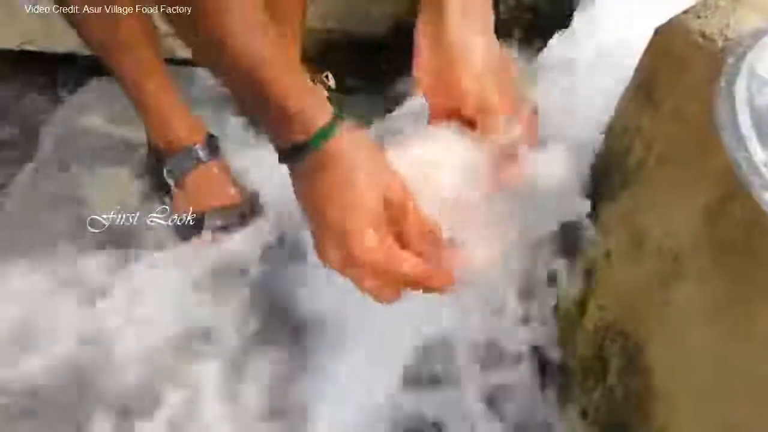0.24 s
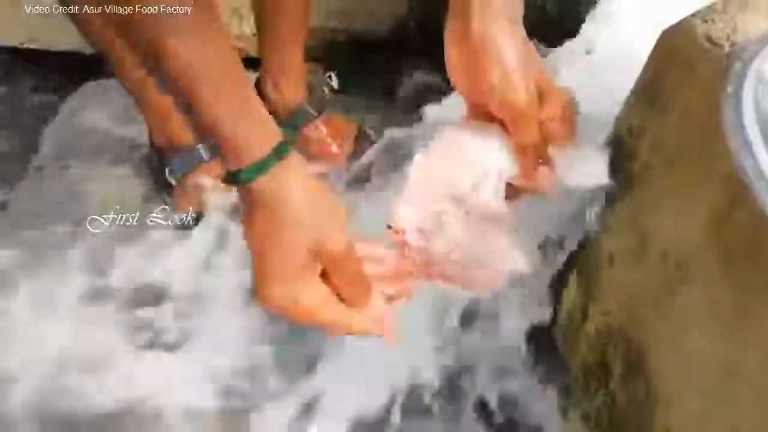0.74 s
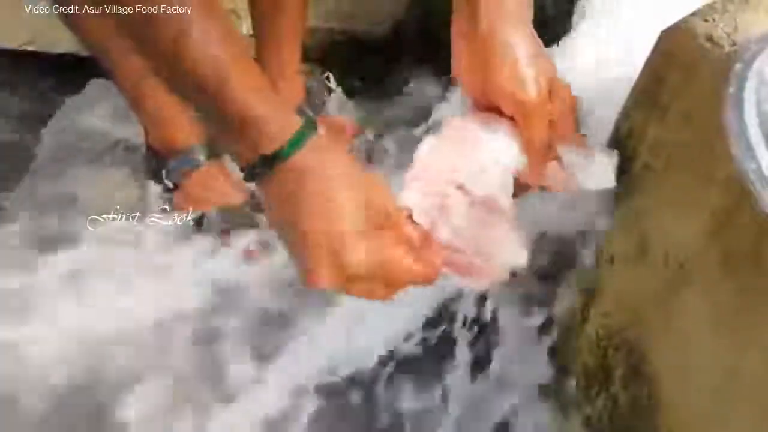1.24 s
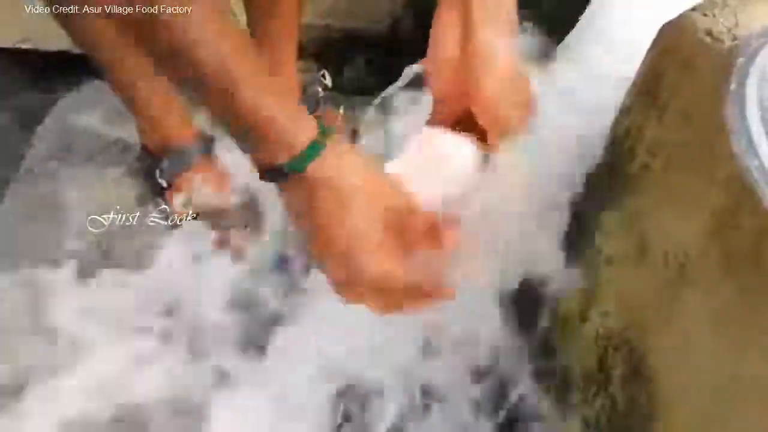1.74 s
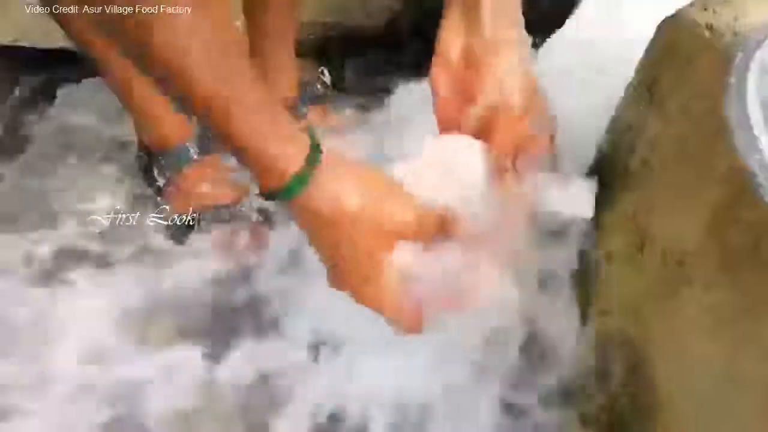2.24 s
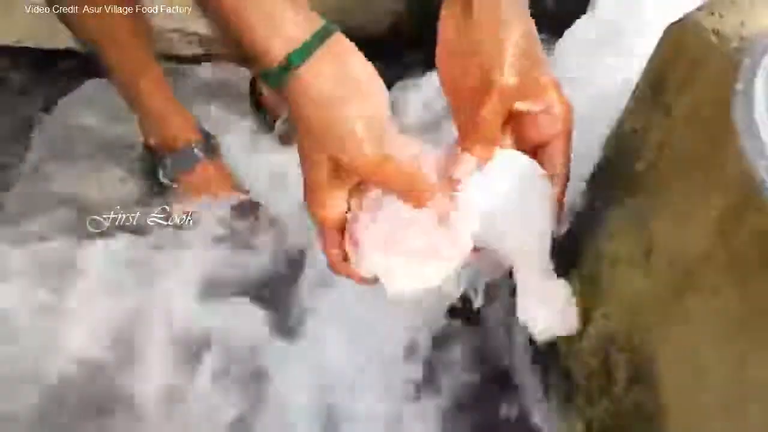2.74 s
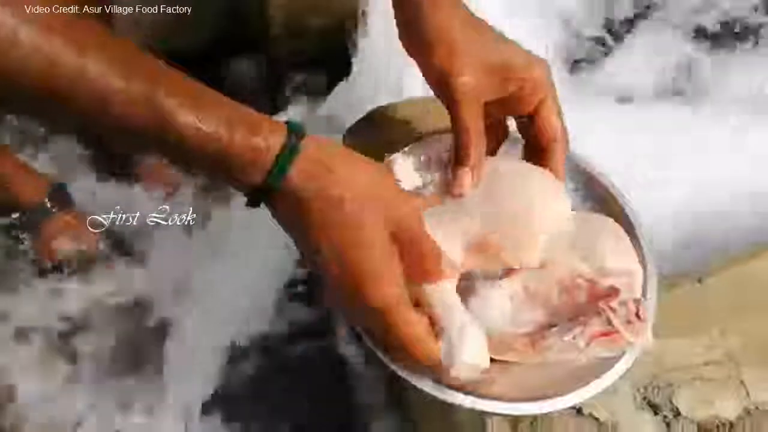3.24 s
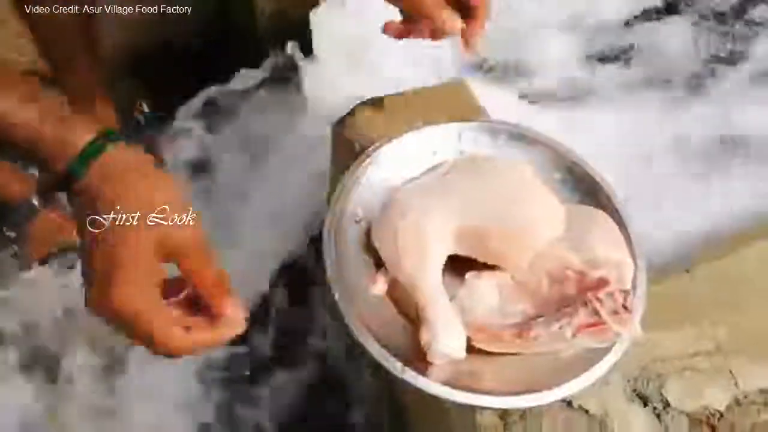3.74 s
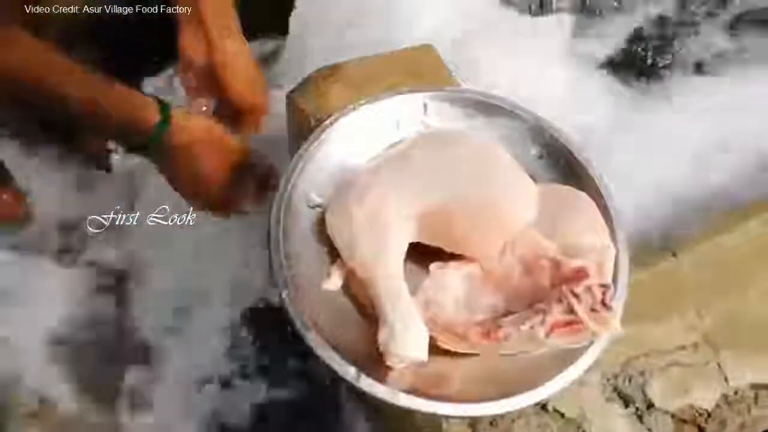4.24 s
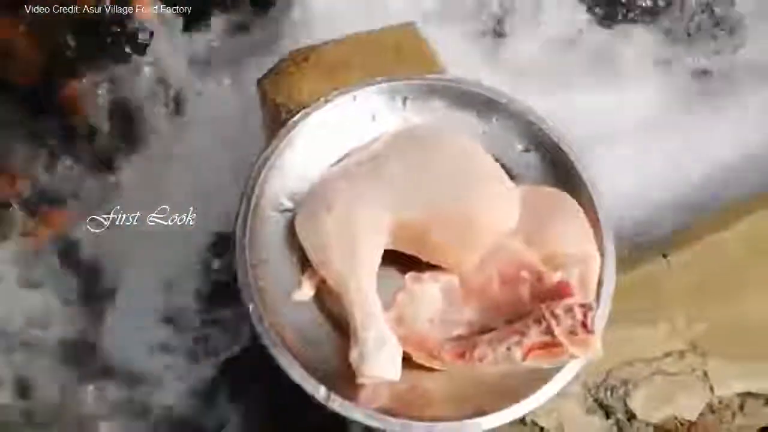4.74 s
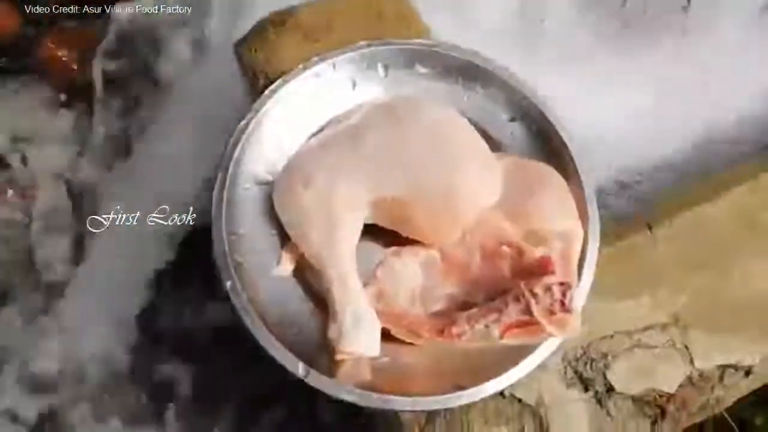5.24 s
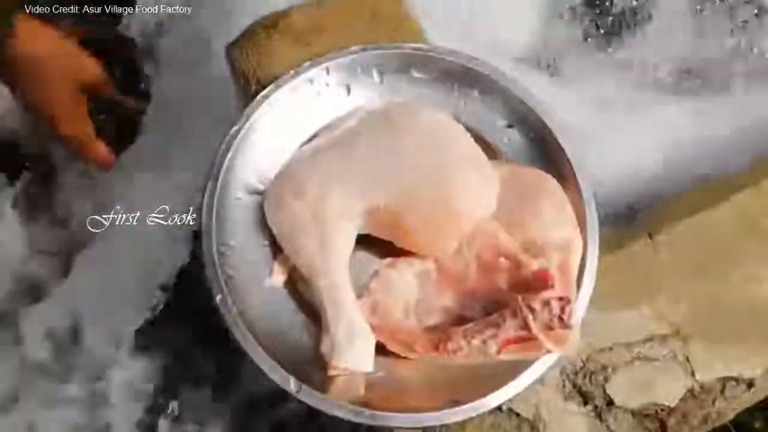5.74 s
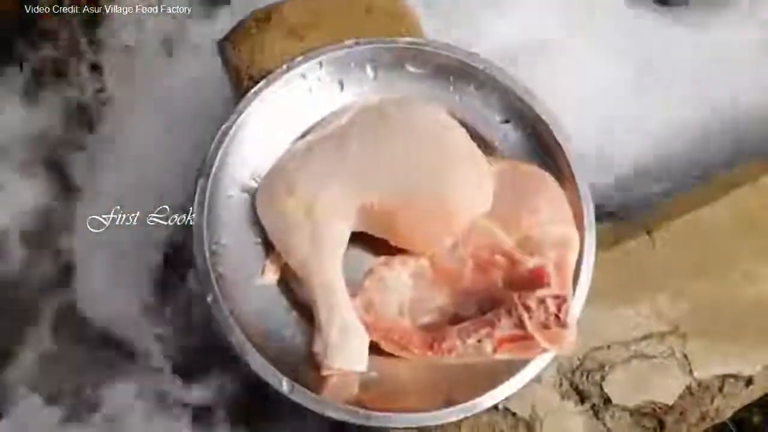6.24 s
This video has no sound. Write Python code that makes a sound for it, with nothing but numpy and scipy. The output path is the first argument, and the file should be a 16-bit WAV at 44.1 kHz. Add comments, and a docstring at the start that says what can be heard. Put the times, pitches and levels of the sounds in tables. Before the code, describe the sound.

From 0 s a fast stream gushes close by outdoors, a dense bright hiss with mid splashing, light low churn, tiny ringing droplets and occasional gulps near 0.6 and 1.2 s. At about 1.53 s it fades abruptly into roughly a tenth of a second of silence, snapping back at 1.7 s from another spot. Splashes swell around 1.9-2.3 s, with slaps near 2.0, 2.1, 2.6 and 3.0 s and hollow glugs between. At 3.39 s a thin steel plate gives a dull knock, then a loud, sharp scrape at 3.42 s, with squeals and smaller grating jerks until about 3.7 s, metallic ringing and faint rubs to 4.2 s. The water dips under the scrape, then recovers. It surges at 4.7 and 5.1 s; thrown drops at 5.15-5.5 s make the plate shimmer faintly with a thin tone. Water runs on, slightly softer and duller, to about 6.5 s.

```python
"""Gushing water and a shifting steel plate.

Water gushes over a concrete channel edge, heard from two places with a short silence between.
The rush is filtered noise with ringing droplets and bubbles; gulps and glugs are decaying tones.
Midway a steel plate scrapes on the concrete, then grates, squeals and rings as noise drives its modes.
Later some thrown water makes it shimmer faintly."""
import sys
import numpy as np
from scipy import signal
from scipy.fft import rfft, irfft
from scipy.io import wavfile
from scipy.ndimage import uniform_filter1d

SR = 44100
rng = np.random.default_rng(int(sys.argv[2]) if len(sys.argv) > 2 else 0)


def output_pcm(signal):
    """Save a mono or channel-first signal as 16-bit PCM at the path in sys.argv[1].

    Samples are clipped to [-1, 1] before scaling.
    """
    pcm = np.clip(np.atleast_2d(signal).T, -1, 1) * 32767
    wavfile.write(sys.argv[1], SR, np.round(pcm).astype(np.int16))


N = 286195
TIME = np.arange(N) / SR

# short silence: fade_s, gone_s, return_s, full_s
SILENCE_S = (1.533, 1.585, 1.702, 1.706)
# water colour at the second place: freq_hz, level_db (per Hz, relative)
RUSH_SECOND = [(25, -38), (70, -4), (230, -10), (345, 1.5), (450, -2.5), (800, 1), (1100, 4.5), (2200, 3.5),
               (3500, -2), (5500, -3), (8400, 4), (10100, 1), (11900, 4), (15000, -11)]
# plate modes: settled_hz, level_db (relative), t60_s, sharp_share (early excess of pitch),
# lead_turns (left ear ahead of right)
PLATE = [(614, -9.5, 0.31, 0.0019, 0.37), (896, -13.5, 0.22, 0, 0.13), (1344, -4, 0.13, 0, .22),
         (1677, 1, .09, 0.011, 0.22), (1920, -4.5, 0.13, .044, -0.31), (2480, -2, 0.049, 0.015, -0.26),
         (2656, 0, 0.084, 0, 0), (2755, -7, .3, 0.007, -0.12), (2880, -1, 0.26, 0.016, -0.075),
         (3124, -2.5, 0.13, 0.0072, -0.28), (3560, -4, .12, 0, -0.34), (3770, 4, .12, 0.023, -0.36),
         (4820, -4, 0.13, .007, -0.057), (6580, -10, .08, 0.023, 0.42), (6940, -3, 0.077, 0, 0.0092),
         (7750, 0.5, .05, 0.0042, 0.24), (8100, 0, 0.062, 0, -0.32), (8780, -1, .05, 0, 0.15),
         (9470, 0.5, 0.061, 0, -.2), (10080, -2, .04, 0, 0.016), (11680, -2, .05, 0, 0.12),
         (12200, 2, 0.045, 0, -0.28)]
# grit under the plate: freq_hz, level_db (per Hz, relative)
GRIT = [(300, -25), (1200, -9), (2100, -17), (2900, 5), (3450, -12), (4200, -14), (6300, -7), (8000, -5),
        (10000, -5), (12000, -8), (15000, -25)]
# plate slides: peak_s, level_db (relative), decay_s, tilt_db (per octave)
SCRAPES = [(3.416, -8, 0.023, 3.5), (3.476, -19, 0.0081, 1), (3.496, -23.5, 0.025, -1.5),
           (3.541, -22, 0.0085, -1), (3.594, -24.5, 0.024, -3), (3.635, -22, 0.018, 0.5),
           (3.679, -26, 0.0072, 1), (3.698, -23.5, 0.0066, 0)]
# fingers rub lightly over the settling plate: peak_s, level_db (relative), rise_s, decay_s
RUBS = [(3.5, -29.5, 0.033, 0.2), (3.88, -34, 0.12, 0.14), (4.115, -33, 0.051, 0.15)]
SCRAPE_RISE = 0.44  # rise time of a push, as a share of its decay time


def amp(db):
    """Decibels to gain."""
    return 10 ** (np.asarray(db) / 20)


def evened(x):
    """Scales to an rms of one."""
    return x / np.sqrt(np.mean(x ** 2) + 1e-20)


def read(points, hz):
    """Reads a spectrum on a log-frequency axis."""
    f, value = np.transpose(points)
    return np.interp(np.log(hz + 1), np.log(f + 1), value)


def add(mix, s, sound):
    """Mixes a sound in at a time."""
    part = mix[..., max(round(s * SR), 0):][..., :sound.shape[-1]]
    part += sound[..., :part.shape[-1]]


def coloured(x, points):
    """Filters by a spectrum."""
    size = 2 ** 19
    gain = amp(read(points, np.fft.rfftfreq(size, 1 / SR)))
    return irfft(rfft(x, size) * gain)[..., :N]


def drift(shape, size):
    """Smooth random values of unit rms, blurred over the given size along each axis."""
    x = rng.standard_normal(shape)
    for axis, width in enumerate(size):
        for _ in range(2):
            x = uniform_filter1d(x, width, axis, mode="wrap")
    return evened(x)


def short_spectra(x):
    """Short-time spectra: channels x frames x bins."""
    return signal.stft(x, nperseg=512, noverlap=384)[2].swapaxes(-1, -2)


def swell(s, rise_s, decay_s, t=TIME):
    """Gaussian rise to one at time s, then exponential decay."""
    exponent = np.where(t < s, ((t - s) / rise_s) ** 2, (t - s) / decay_s)
    return np.exp(-np.minimum(exponent, 60))


def flutter(shape, width_hz):
    """The wandering strength and phase of a resonance of this width under random drive."""
    pole = np.exp(-np.pi * abs(width_hz) / SR)
    z = rng.standard_normal(shape) + 1j * rng.standard_normal(shape)
    for _ in range(2):
        z = signal.lfilter([1 - pole], [1, -pole], z)
    return z / np.sqrt(np.mean(abs(z) ** 2) / 2)


def at_ears(lead_turns):
    """Each mode reaches the two ears with its own phase difference."""
    return np.exp(2j * np.pi * np.array([[lead_turns], [0]]))


def mode_pitch(hz, sharp_share, t):
    """The pitch of a mode, which sounds sharp at first, then drops at once to its settled pitch."""
    # the second time is the moment of the drop: unused_s, drop_s
    drop_s = (3.8, 3.63)
    # points in descending order make interp step from 1 to 0 at drop_s
    return hz * (1 + sharp_share * np.interp(t, drop_s, [1, 0]))


def singing(hz, t, chatter_db, lead_turns, waver_hz=11, judder_db=2.4):
    """One plate mode, unsteady in pitch and level; uneven slipping spreads it into a rough edge."""
    chatter_hz = 110
    turns = np.cumsum(hz + waver_hz * drift(t.shape, (90,))) / SR
    rough = amp(chatter_db) * flutter((2, len(t)), 2 * chatter_hz) / np.sqrt(2)
    strength = amp(judder_db * drift(t.shape, (200,))) + rough
    return evened((strength * np.exp(2j * np.pi * turns) * at_ears(lead_turns)).real)


def bubbles(low_hz, high_hz, per_s, cycles, spread_db, glide, count=48):
    """Each bubble rings for a few cycles, rising in pitch, at a random time, strength and place."""
    out = np.zeros((2, N))
    for hz in np.geomspace(low_hz, high_hz, count):
        # age in decay times
        age = np.arange(int(5 * cycles * SR / hz) + 2) * hz / SR / cycles
        envelope = np.exp(-age) * (1 - np.exp(-8 * age))
        ring = envelope * np.sin(2 * np.pi * cycles * age * (1 + glide * age))
        when, size, place, alive = rng.random((4, 1024))
        keep = alive < per_s * N / SR / count / len(alive)
        gain = hz * amp(spread_db * np.minimum(-np.log(size[keep]), 3.3))
        at = (when[keep] * N).astype(int)[:, None] + np.arange(len(ring))
        pan = np.pi * place[keep]
        for channel, side in enumerate([np.cos(pan), np.sin(pan)]):
            rings = np.outer(gain * side, ring)
            out[channel] += np.bincount(at.ravel(), rings.ravel(), N)[:N]
    return evened(out)


def foam(patch_db=3.0, clump_db=2.5, flicker_db=0.73, drops_db=-4, fizz_db=-8.5, gurgle_db=-6, plinks_db=-15):
    """Patchy hiss of collapsing foam, with droplets, fizz and larger bubbles in it."""
    z = short_spectra(rng.standard_normal((2, N)))
    clumps = clump_db * drift(z.shape[1:], (11, 2))  # near enough to reach both ears alike
    patches = patch_db * np.minimum(drift(z.shape, (1, 13, 3)), 2)
    z = z * amp(patches + np.minimum(clumps, 2 * clump_db))
    drops = bubbles(1630, 17000, per_s=3600, cycles=0.71, spread_db=1.5, glide=0.029)
    fizz = bubbles(900, 12000, per_s=2000, cycles=14, spread_db=2.6, glide=0.008)
    gurgle = bubbles(180, 1800, per_s=260, cycles=5, spread_db=3.4, glide=0.02)
    gurgle = gurgle * np.sqrt(1800 / (SR / 2))  # power in proportion to its top frequency
    plinks = bubbles(600, 3800, per_s=130, cycles=20, spread_db=2.6, glide=0.012)
    rings = amp(drops_db) * drops + amp(fizz_db) * fizz
    rings = rings + amp(gurgle_db) * gurgle + amp(plinks_db) * plinks
    z = z + short_spectra(rings)
    return z * amp(flicker_db * drift(z.shape[1:2], (6,)))[:, None]


def rush(z, colour, side, same, level_db):
    """The foam heard from one place; churn, splash and spray follow the flow, surge and slosh."""
    # bands of churn, splash and spray: from_hz, to_hz
    flow_bands = [(150, 600), (700, 2500), (6500, 14000)]
    # slow course of the water: time_s, splash_db, spray_db (relative)
    flow = [(0, -37, -32.5), (.25, -35.5, -31), (1.5, -36, -32.5), (1.72, -35.5, -36.5),
            (1.88, -32.5, -32.5), (2.24, -32.5, -33.5), (2.42, -34.5, -35), (3.3, -35, -36.5),
            (3.55, -31.5, -31.5), (3.86, -34, -35.5), (4.12, -34.5, -34.5), (4.4, -35.5, -36),
            (5.0, -36, -37), (5.35, -35.5, -36.5), (5.85, -36, -37.5), (6.47, -36.5, -38.5)]
    # level of the bass churn: time_s, level_db (relative)
    churn = [(0, -45), (.8, -45.5), (1.5, -44), (1.72, -46), (2.25, -45), (2.9, -48), (3.36, -46.5),
             (3.47, -47.5), (4.1, -47), (5.9, -47), (6.47, -52)]
    # the stream heaves up and falls back: crest_s, lift_db (before each band's share)
    crests = [(.01, 1.5), (.23, 1.5), (.58, 1.5), (1.2, 2), (1.86, 2.5), (2.22, 2.5), (2.75, 2.5),
              (3.13, 1), (3.25, 2.5), (4.68, 4), (5.06, 4)]
    # share of the surge lift: churn, splash, spray [ratio]
    surge_shares = (1.24, 0.8, 1)
    # rms of random sloshing: churn_db, splash_db, spray_db
    slosh_rms_db = (0.03, 0.06, 0.54)

    hz, t = np.linspace(0, SR / 2, z.shape[2]), np.linspace(0, N / SR, z.shape[1])
    coherence = np.clip(read(same, hz), -1, 1)
    ears = amp(np.array([read(side, hz), -read(side, hz)]) / 2)
    ears = ears / np.sqrt(np.mean(ears ** 2, 0)) * amp(read(colour, hz))
    right = coherence * z[0] + np.sqrt(1 - coherence ** 2) * z[1]
    z = np.array([z[0], right]) * ears[:, None]
    power = np.mean(abs(z) ** 2, (0, 1)) * 4 / 3  # one-sided Hann bins to signal power

    s, splash, spray = np.transpose(flow)
    levels = [np.interp(t, *np.transpose(churn)), np.interp(t, s, splash), np.interp(t, s, spray)]
    surge_db = sum(db * swell(crest, 0.034, 0.021, t) for crest, db in crests)
    # churn holds the bass, splash the middle, spray the treble
    zones = [[(450, 1), (850, 0)], [(450, 0), (850, 1), (2600, 1), (6500, 0)], [(2600, 0), (6500, 1)]]
    gain_db = level_db
    for level, share, slosh_db, (lo, hi), zone in zip(levels, surge_shares, slosh_rms_db, flow_bands, zones):
        wanted_db = level + share * surge_db + slosh_db * drift(t.shape, (20,))
        present_db = 10 * np.log10(power[(hz > lo) & (hz < hi)].sum())
        gain_db = gain_db + np.outer(wanted_db - present_db, read(zone, hz))
    return signal.istft((z * amp(gain_db)).swapaxes(1, 2), nperseg=512, noverlap=384)[1][:, :N]


def return_step(level_db=-41, rise_s=0.0032, decay_s=0.1):
    """A nearly inaudible step in pressure level where the sound cuts back in, dying away."""
    return amp(level_db) * swell(SILENCE_S[3], rise_s, decay_s)


def gulps(level_db=-1, decay_s=0.0051, rise_s=0.0041, glide_per_s=0.37):
    """Large air pockets ring briefly and climb in pitch as they reach the surface."""
    # air pockets: start_s, level_db (relative), pitch_hz (at the start)
    pockets = [(0.556, -30, 228), (1.204, -29, 860), (1.212, -32, 409), (2.236, -31.5, 805),
               (2.377, -24, 332), (2.471, -28, 455), (2.842, -31, 335), (2.874, -28.5, 780),
               (3.004, -30, 348), (3.131, -28, 340), (3.155, -34, 270), (3.992, -27, 390),
               (5.903, -31.5, 262)]
    out, t = np.zeros(N), np.arange(SR // 8) / SR
    envelope = (1 - np.exp(-t / rise_s)) * np.exp(-t / decay_s)
    for s, db, hz in pockets:
        tone = 2 * np.sin(2 * np.pi * hz * t * (1 + glide_per_s * t))
        add(out, s, amp(db + level_db) * envelope * tone)
    return out


def glugs(level_db=-3.0, rise_s=0.0063, decay_s=0.016, spread=0.3, apart=0.61):
    """A cluster of like-sized bubbles rings around one pitch, a little differently at each ear."""
    # clusters: peak_s, level_db (relative), pitch_hz
    clusters = [(.602, -31.5, 1233), (1.858, -30.5, 1144), (2.03, -28, 1150), (2.232, -35, 2250),
                (2.527, -32, 1380), (3.256, -29, 1764), (3.854, -35, 1440), (4.253, -29.5, 1106),
                (4.609, -32.5, 993), (4.836, -30.5, 1930), (5.163, -30, 2170), (5.51, -32, 998)]
    out, t = np.zeros((2, N)), np.arange(-SR // 40, SR // 10) / SR
    shape = swell(0, rise_s, decay_s, t)
    for s, db, hz in clusters:
        z = flutter((3, len(t)), spread * hz)
        ring = ((z[0] + apart * z[1:]) * np.exp(2j * np.pi * hz * t)).real
        add(out, s + t[0], amp(db + level_db) * np.sqrt(np.mean(shape ** 2)) * evened(shape * ring))
    return out


def slaps(level_db=-1, rise_s=0.0017, decay_s=0.028):
    """Thrown water lands in short bursts of spiky, water-coloured noise."""
    # slaps of water: peak_s, level_db (relative)
    bursts = [(2.025, -29.5), (2.112, -28), (2.616, -29.5), (3.017, -29), (4.822, -30.5), (5.155, -28),
              (5.506, -37)]
    spatter = evened(coloured(rng.laplace(size=(2, N)), RUSH_SECOND))
    return amp(level_db) * spatter * sum(amp(db) * swell(s, rise_s, decay_s) for s, db in bursts)


def sprinkle():
    """Thrown water lands in several handfuls; the plate shimmers and holds one thin tone."""
    # droplets on steel: freq_hz, level_db (per Hz, relative)
    droplets = [(1000, -23), (2400, 0), (3300, 3), (5500, -17), (6500, -15), (7000, 4), (7600, -1),
                (8100, 5), (8750, 4), (9700, -10), (11800, -5), (15000, -22)]
    # handfuls of water: peak_s, level_db, rise_s, decay_s
    handfuls = [(5.172, -32, 0.01, 0.079), (5.315, -34, 0.058, 0.05), (5.505, -34.5, 0.017, 0.036)]
    # thin tone started by the first drops: level_db, pitch_hz, decay_s
    ting = (-38, 2500, 0.23)
    db, hz, decay_s = ting
    s, _, rise_s, _ = handfuls[0]
    shimmer = evened(coloured(rng.laplace(size=(2, N)), droplets))
    landing = sum(amp(level) * swell(at, up, down) for at, level, up, down in handfuls)
    tone = singing(hz, TIME, chatter_db=-14, lead_turns=0.32)
    return landing * shimmer + amp(db) * swell(s, rise_s, decay_s) * tone


def knock(rise_s=0.00035, decay_s=0.0027):
    """The plate tips onto the concrete: a short dull tone just before it slides."""
    # contact: peak_s, level_db (relative), pitch_hz
    contact = (3.391, -27.5, 820)
    s, db, hz = contact
    return amp(db) * swell(s, rise_s, decay_s) * 2 * np.sin(2 * np.pi * hz * (TIME - s))


def rubbing(level_db=-4):
    """Fine grit hisses under the rim while the plate is nudged into place."""
    push = sum(amp(db) * swell(s, rise_s, decay_s) for s, db, rise_s, decay_s in RUBS)
    return amp(level_db) * push * evened(coloured(rng.standard_normal((2, N)), GRIT))


def squeals(level_db=-1.0):
    """The rim sticks and slips in step with one mode and a fainter tone just above it, then lets them ring."""
    # the rim catches: peak_s, level_db (relative), settled_hz, decay_s
    catches = [(3.416, -14, 1935, 0.014), (3.445, -11.5, 1935, .02), (3.449, -24, 3770, .015),
               (3.475, -23, 1345, .045), (3.497, -18.5, 3090, 0.011), (3.515, -27, 4765, .015),
               (3.526, -20.5, 3770, 0.011), (3.535, -28, 1930, 0.018), (3.548, -24, 2894, .04),
               (3.605, -20.5, 3090, .012), (3.652, -23.5, 2752, .022), (3.68, -26.5, 3770, .05),
               (3.696, -17.5, 2758, .028), (3.77, -27, 2755, .035), (3.837, -28, 2762, .05),
               (3.89, -39, 1930, .06), (3.991, -31, 2758, 0.041)]
    rise_share, chatter_db = 0.6, -14
    twin_ratio, twin_db = 1.045, -11.5  # a fainter tone 4.5% above sings along
    linger_db, linger_s = -12, 0.12  # free ring after the rim lets go
    out = np.zeros((2, N))
    for s, db, hz, decay_s in catches:
        # sharpness and ear phase come from the nearest plate mode
        *_, sharp_share, lead_turns = min(PLATE, key=lambda mode: abs(mode[0] - hz))
        rise_s = rise_share * decay_s
        t = s - 3 * rise_s + np.arange(SR * 3 // 4) / SR
        pitch = mode_pitch(hz, sharp_share, t)
        linger = amp(linger_db) * swell(s, rise_s, linger_s, t)
        shape = np.maximum(swell(s, rise_s, decay_s, t), linger)
        twin = amp(twin_db) * singing(pitch * twin_ratio, t, chatter_db, lead_turns)
        tone = singing(pitch, t, chatter_db, lead_turns) + twin
        add(out, t[0], amp(db + level_db) * shape * tone)
    return out


def plate(level_db=-1, uneven_db=5.0, bend=0.0034, rub_db=-3, apart=0.82):
    """Scrapes and rubs feed the lasting modes; the moving contact favours each in turn and bends its pitch."""
    # span in which the modes are driven: from_s, to_s
    span_s = (3.35, 4.8)
    out, t = np.zeros((2, N)), np.arange(*span_s, 1 / SR)
    push = sum(amp(db) * swell(s, SCRAPE_RISE * decay_s, decay_s, t) for s, db, decay_s, _ in SCRAPES)
    push = push + sum(amp(db + rub_db) * swell(s, rise_s, decay_s, t) for s, db, rise_s, decay_s in RUBS)
    total = np.sqrt(sum(amp(db) ** 2 for _, db, *_ in PLATE))
    for hz, db, t60_s, sharp_share, lead_turns in PLATE:
        pole = np.exp(-np.log(1000) / t60_s / SR)
        pitch = mode_pitch(hz, sharp_share, t) * (1 + bend * drift(t.shape, (900,)))
        turn = np.exp(2j * np.pi * np.cumsum(pitch) / SR)
        grit = evened(rng.standard_normal(len(t)) + apart * rng.standard_normal((2, len(t))))
        slips = push * grit * amp(uneven_db * np.minimum(drift(t.shape, (1300,)), 1))
        # a one-pole filter in the mode's rotating frame is a resonator of moving pitch
        ring = turn * signal.lfilter([np.sqrt(2 * (1 - pole ** 2))], [1, -pole], slips * turn.conj())
        add(out, t[0], amp(db + level_db) / total * (ring * at_ears(lead_turns)).real)
    return out


def grating(level_db=0, grain_db=-3.0, clatter_db=3.5, t60_s=0.039, count=110):
    """Steel slides on concrete: each push meets other grit and rattles other damped modes."""
    out, t = np.zeros((2, N)), np.arange(-SR // 25, SR // 6) / SR
    age_s = np.arange(SR // 25) / SR
    for s, db, decay_s, tilt_db in SCRAPES:
        push = amp(db + level_db) * swell(0, SCRAPE_RISE * decay_s, decay_s, t)
        uneven_db = grain_db * drift(t.shape, (12,)) + clatter_db * drift(t.shape, (110,))
        slips = push * rng.standard_normal((2, len(t))) * amp(uneven_db)
        hz = 500 + 14500 * (np.arange(count) + rng.random(count)) / count
        phase = np.exp(2j * np.pi * rng.random((2, count)))
        strength = amp(read(GRIT, hz) + tilt_db * np.log2(hz)) * phase
        ring = (strength @ np.exp(2j * np.pi * np.outer(hz, age_s))).real * amp(-60 * age_s / t60_s)
        rattle = evened(signal.fftconvolve(slips, ring, axes=1)[:, :len(t)])
        add(out, s + t[0], np.sqrt(np.mean(push ** 2)) * rattle)
    return out


def scene():
    """The first place, a short silence, then the second place, moving in over the plate."""
    # water colours: freq_hz, level_db (per Hz, relative)
    rush_first = [(25, -21), (80, -13), (250, -3), (550, -3.5), (1000, 4.5), (1900, -1.5), (2650, 9),
                  (3150, 3), (4500, -0.5), (5700, -4.5), (8000, -0.5), (11600, 5), (13500, -0.5),
                  (15000, -8.5)]
    rush_late = [(25, -36), (80, -13), (230, -3.5), (340, -9.5), (630, -4.5), (1030, 3), (2500, 0.5),
                 (4300, 0), (5900, -6), (8200, -3), (10100, -5.5), (11800, 0.5), (15000, -15)]
    # left over right at each place: freq_hz, level_db
    side_first = [(300, -0.5), (1000, 1), (1500, -6), (2000, 0.5), (2650, -12.5), (3300, -3), (6000, 0),
                  (8500, -3.5), (10000, -11), (11800, -19.5), (15000, -9.5)]
    side_second = [(300, 0), (1100, 0), (2000, 4.5), (3200, -1), (4600, -5), (6800, 6), (8500, 3.5),
                   (10200, -2), (11700, -7), (15000, 0.5)]
    # likeness of the two ears: freq_hz, coherence [-1 to 1]
    same_first = [(60, 0.49), (130, 1), (290, 0.78), (640, 0.26), (1410, 0.14), (3100, -0.24), (6820, 0.11)]
    same_second = [(60, 0.92), (130, 1), (290, 0.94), (640, 0.51), (1410, 0.36), (3100, 0), (15000, 0.03)]
    # the listening point moves in over the plate: from_s, to_s
    move_s = (1.75, 5.8)

    z = foam()  # one body of water, heard from three spots
    first = rush(z, rush_first, side_first, same_first, level_db=-0.17)
    second = rush(z, RUSH_SECOND, side_second, same_second, level_db=-0.8)
    late = rush(z, rush_late, side_second, same_second, level_db=-0.34)
    moving = second + (late - second) * np.interp(TIME, move_s, [0, 1])
    fade_out = np.interp(TIME, SILENCE_S[:2], [1, 0]) ** 3
    fade_in = np.interp(TIME, SILENCE_S[2:], [0, 1])
    water = first * fade_out + moving * fade_in
    water = water + gulps() + glugs() + slaps() + return_step()
    steel = knock() + grating() + plate() + rubbing() + squeals() + sprinkle()
    return water + steel


def record(dry, threshold_db=-26, recover_db_per_s=50):
    """Gain control takes off half of any excess and so ducks the water after the scrape; then the band limit."""
    edge_hz = 15150
    power_db = 10 * np.log10(abs(uniform_filter1d((dry ** 2).mean(0), size=500)) + 1e-12)
    fall_db = TIME * recover_db_per_s
    held_db = np.maximum.accumulate(power_db + fall_db) - fall_db  # peaks fall at the recovery rate
    over_db = np.maximum(held_db - threshold_db, 0)
    ducked = dry / amp(uniform_filter1d(over_db, size=400) / 2)
    lowpass = signal.firwin(511, edge_hz, window=("kaiser", 9), fs=SR)
    return signal.oaconvolve(ducked, lowpass[None], "same")


dry = scene()
out = record(dry)
output_pcm(out)
```